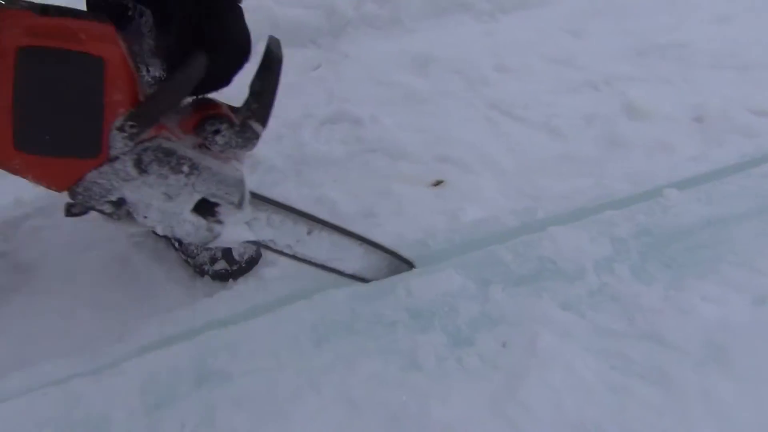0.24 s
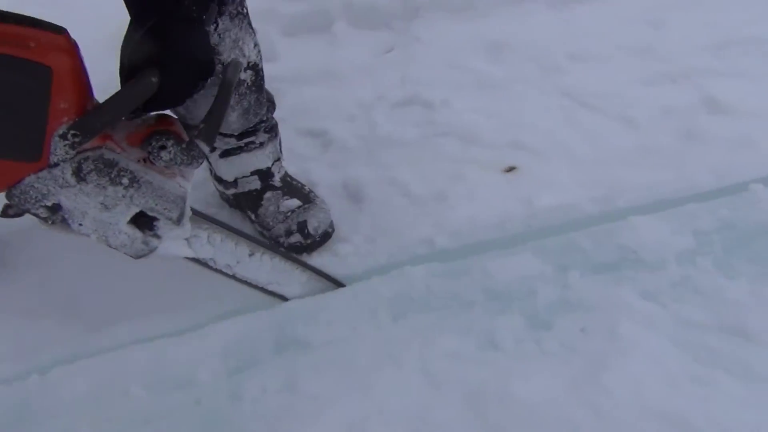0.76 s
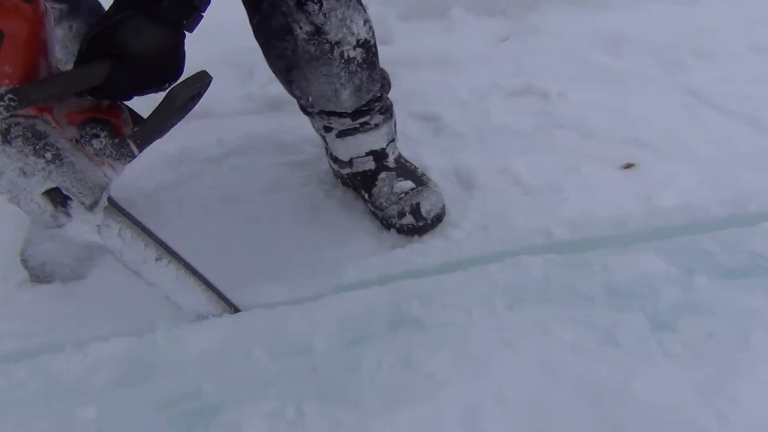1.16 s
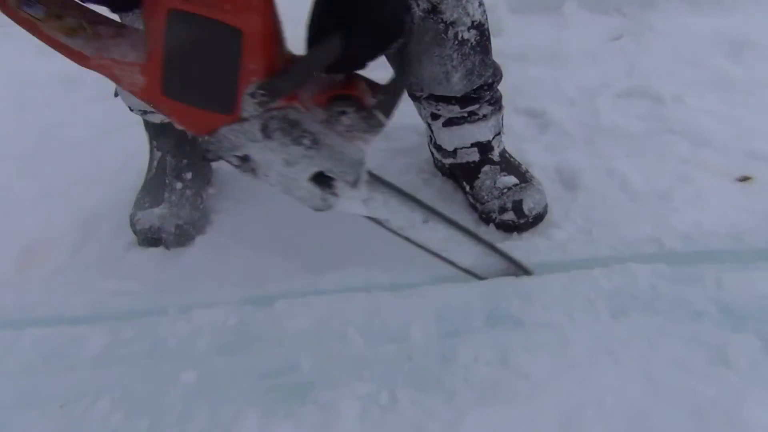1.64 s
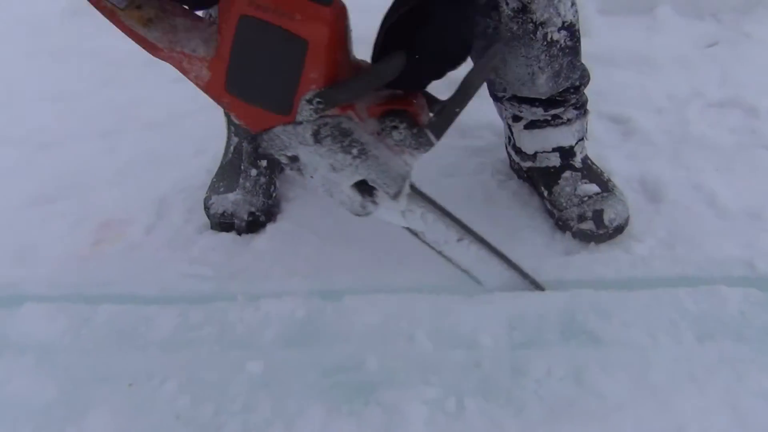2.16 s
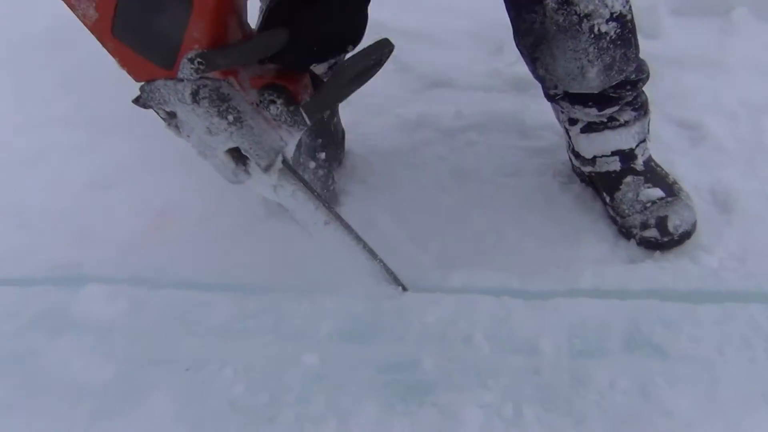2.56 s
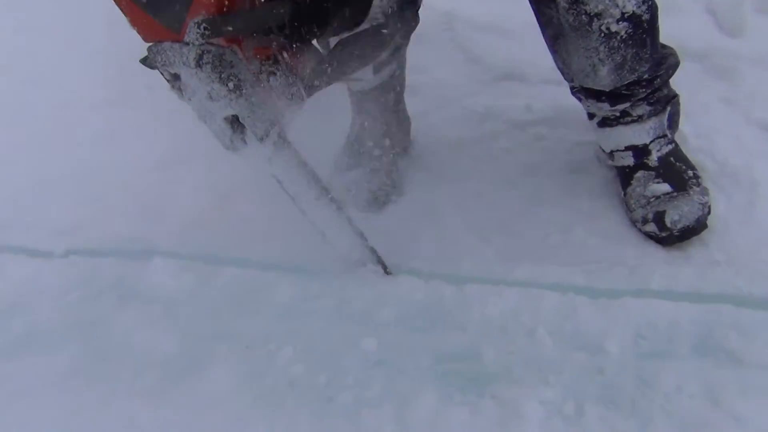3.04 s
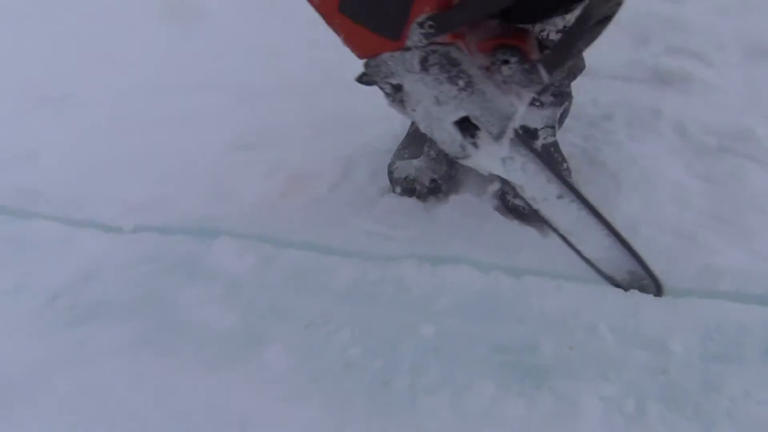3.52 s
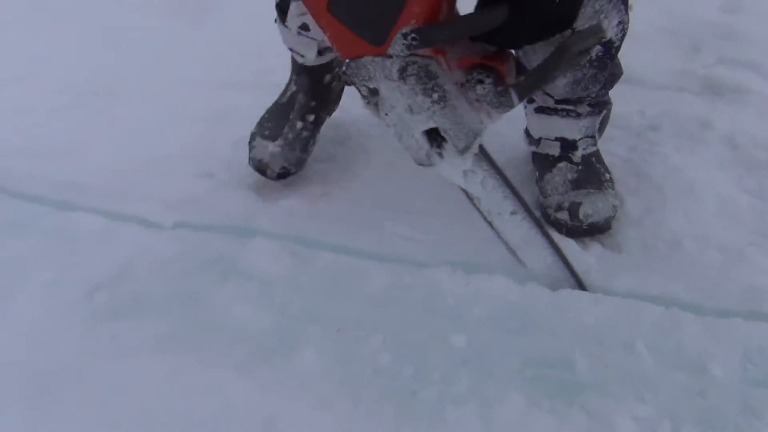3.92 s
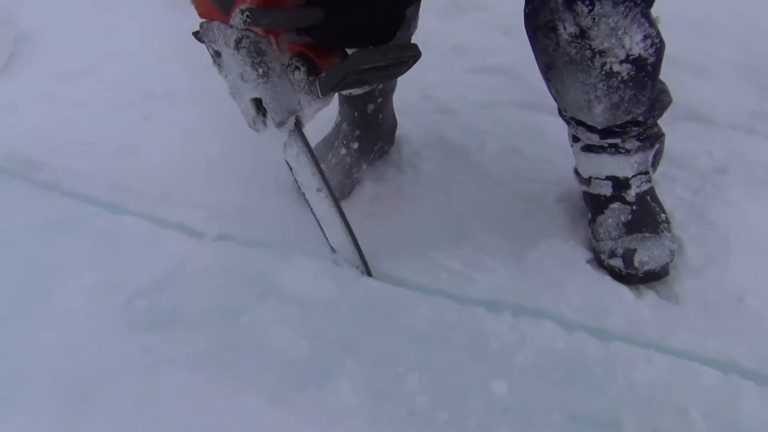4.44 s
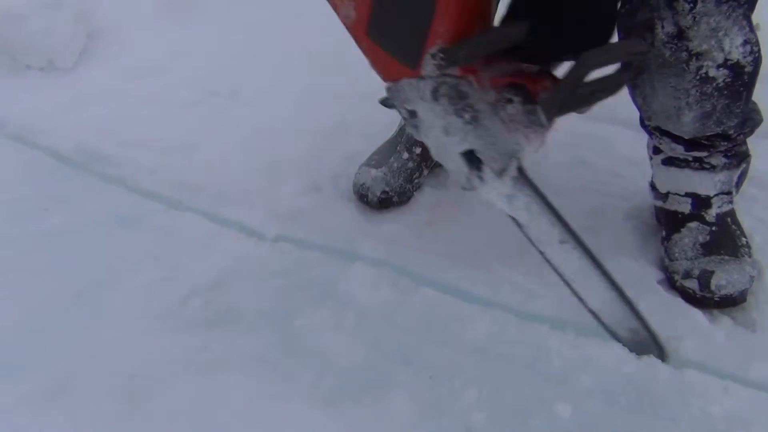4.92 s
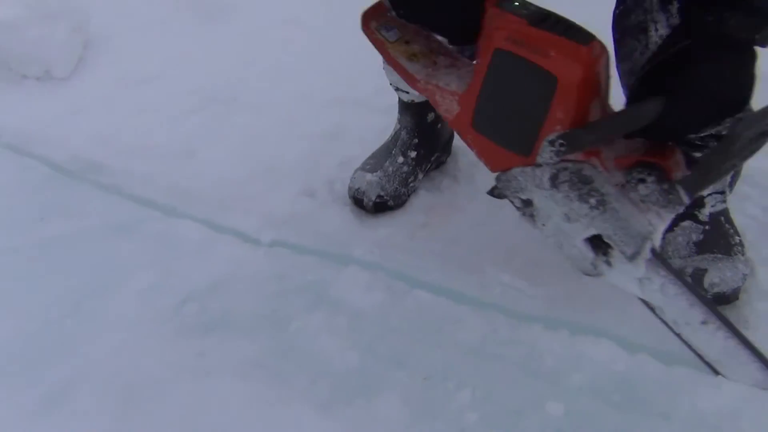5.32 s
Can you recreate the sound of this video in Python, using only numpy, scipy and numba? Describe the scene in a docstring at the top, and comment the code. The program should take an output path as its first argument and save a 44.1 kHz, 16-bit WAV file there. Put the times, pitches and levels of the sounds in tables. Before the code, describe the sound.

Close by on a frozen lake, a two-stroke chainsaw is already cutting ice at high revs and keeps going without a break. The bright hiss of the sliding chain and flying ice chips sits on top of a shivering whine and the engine's buzz. The cut growls each time the bar is pressed in, then eases. The open air adds no reverberation, and a light wind is barely audible underneath.

```python
"""On a frozen lake, close by: a two-stroke chainsaw at full throttle works a slot in thick ice.
Drive links whine on the six-tooth sprocket, cutters chip the ice and growl with each push,
chain and chips hiss along the bar, and the exhaust buzzes underneath. A light wind rumbles.
Snow swallows all reverberation; only the ice sheet returns one short reflection."""
import sys
import numpy as np
from scipy import signal
from scipy.fft import rfft, irfft, next_fast_len
from scipy.io import wavfile
from scipy.ndimage import uniform_filter1d, map_coordinates
from numba import njit

SR = 44100
rng = np.random.default_rng(int(sys.argv[2]) if len(sys.argv) > 2 else 0)


def unload_wav(signal):
    """Save mono or channel-first audio to the path in sys.argv[1] as 16-bit WAV at rate SR, clipped to [-1, 1]."""
    wavfile.write(
        sys.argv[1],
        SR,
        np.round(np.clip(np.atleast_2d(signal).T, -1, 1) * 32767).astype(np.int16),
    )


N = 245637
SPROCKET_TEETH, CHAIN_LINKS = 6, 84


def undb(db):
    """Decibels to gain."""
    return 10 ** (np.asarray(db) / 20)


def curves(table):
    """Each column after the time column, interpolated per sample."""
    time_s, *columns = np.transpose(table)
    return [np.interp(np.arange(N) / SR, time_s, column) for column in columns]


def stretch(db, factor):
    """Scale a level curve's swing about its mean."""
    return db.mean() + factor * (db - db.mean())


def unit(x):
    """Scale to rms 1."""
    return x / np.sqrt(np.mean(x ** 2))


def noise():
    """White noise."""
    return rng.standard_normal(N)


def walk(hz):
    """Random levels held 1 / hz s and smoothed twice; rms 1."""
    hold = max(int(SR / hz), 1)
    steps = np.repeat(rng.standard_normal(N // hold + 1), hold)
    return unit(uniform_filter1d(uniform_filter1d(steps, hold), hold)[:N])


def colour(x, points):
    """Minimum-phase filter through (freq_hz, gain_db) points; output rms 1."""
    size = next_fast_len(N + SR // 4, True) // 2 * 2
    hz, db = np.transpose(points)
    log_hz = np.log(np.arange(size // 2 + 1) * SR / size + 1)
    cepstrum = irfft(np.log(undb(np.interp(log_hz, np.log(hz), db))))
    cepstrum[1:size // 2] *= 2
    cepstrum[size // 2 + 1:] = 0
    return unit(irfft(rfft(x, size) * np.exp(rfft(cepstrum)))[:N])


@njit
def resonance(x, centre_hz, width_hz):
    """State-variable band-pass with a moving centre."""
    out, band_state, low_state = np.empty(len(x)), 0., 0.
    for i in range(len(x)):
        g, damping = np.tan(np.pi * centre_hz[i] / SR), width_hz / centre_hz[i]
        band = (band_state + g * (x[i] - low_state)) / (1 + g * (g + damping))
        band_state, low_state = 2 * band - band_state, low_state + 2 * g * band
        out[i] = damping * band
    return out


def clicks(phase, pattern, scatter_db, jitter_cycles):
    """One click per cycle, sized by a repeating pattern; size and timing scatter."""
    cycle = np.arange(1, int(phase[-1]))
    chance = rng.standard_normal((len(cycle), 2))
    at = np.interp(cycle + jitter_cycles * chance[:, 0], phase, np.arange(N))
    size = pattern[cycle % len(pattern)] * undb(scatter_db * chance[:, 1])
    i = at.astype(int)
    return (np.bincount(i, size * (1 - at + i), N + 1) + np.bincount(i + 1, size * (at - i), N + 1))[:N]


# Wind spectrum: freq_hz, gain_db
WIND_SPECTRUM = [(15, -5), (30, 0.5), (60, -2.5), (120, -7.5), (250, -14.5), (500, -12), (2000, -47)]

def wind():
    """Light wind: a low, uneven rumble, partly different left and right."""
    common = colour(noise(), WIND_SPECTRUM)
    sides = np.array([common + 0.48 * colour(noise(), WIND_SPECTRUM) for _ in range(2)])
    return sides * undb(-63 + 0.73 * walk(12) + 2.8 * walk(35) + np.array([[1.1], [-1.1]]))


# Muffler response: freq_hz, gain_db
MUFFLER = [(60, -8), (154, -11), (310, -7), (460, -13), (620, -0.5), (800, 2), (1100, 5), (1500, -4.5),
           (2200, -2.5), (3300, 0.5), (6000, -13)]

def exhaust(turns):
    """One firing per turn, alternately strong and weak, through the muffler."""
    firings = clicks(turns, undb([0, -4.5]), scatter_db=2.0, jitter_cycles=0.012)
    return colour(firings, MUFFLER) * undb(-51.5 + 3.2 * walk(4.3))


# Pushes of the bar into the ice: start_s, length_s, pressure_frac, lean_frac
BAR_PUSHES = [(0.303, 1.1, 0.73, .7), (1.997, 0.47, 0.94, 0.9), (2.36, .34, .55, 1),
              (2.706, 0.39, 0.36, 0.5), (3.841, 0.33, 0.84, 0.57), (4.16, 0.48, 1, .75),
              (5.21, .43, 0.92, 0.74)]

def pushes(attack_s=0.15, release_s=0.12):
    """Pressure on the ice and lean on the slot wall, 0-1: each push builds, holds and lets go."""
    t, out = np.arange(N) / SR, 0
    for start_s, length_s, pressure, lean in BAR_PUSHES:
        rise, fall = (t - start_s) / attack_s, 1 - (t - start_s - length_s) / release_s
        envelope = np.clip(np.minimum(rise, fall), 0, 1)
        out = np.maximum(out, np.outer([pressure, lean], envelope))
    return out


def lean_hum(turns, lean):
    """Left and right cutters alternate, so a leaning bar hums at about one cycle per four links."""
    phase = turns * SPROCKET_TEETH / 4 * .988 + .08 * walk(30)
    return np.sqrt(2) * np.sin(2 * np.pi * phase) * undb(-86 + 21.5 * lean + 2.0 * walk(20))


# Growl partials: cutter_rate_multiple, offset_db, pressure_swing_frac, blur_cycles
GROWL_TONES = [(.97, -5.5, 0.88, 0.27), (1.022, -2, 0.9, 0.1), (1.53, -18, 0.46, 0.32),
               (2.49, -2.5, 0.4, 0.28), (3, 4, 0.58, 0.4), (5, 11, 0.27, 0.48), (7, -10, 0.4, 0.36)]

def growl(turns, pressure):
    """Cutters hammer at half the link rate; their uneven spacing splits the tone."""
    cutter_phase = turns * SPROCKET_TEETH / 2
    level_db, out = -73 + 25 * pressure, 0
    for multiple, offset_db, swing, blur_cycles in GROWL_TONES:
        tone = np.sqrt(2) * np.sin(2 * np.pi * (multiple * cutter_phase + blur_cycles * walk(45)))
        out = out + tone * undb(stretch(level_db, swing) + offset_db + 2 * walk(50))
    return out


# Bending modes of the steel bar: freq_hz, width_hz, relative_db
BENDING_MODES = [(2600, 70, -56.5), (3114, 71, -52.5), (3380, 160, -49), (3680, 97, -51.5), (4154, 93, -54),
                 (4980, 64, -59), (5560, 140, -62), (6500, 150, -55), (7020, 140, -48)]

def bar_modes():
    """The scraping chain rings the bar's modes; each comes and goes as the ice grips another spot."""
    scrape, out = noise(), 0
    for freq_hz, width_hz, db in BENDING_MODES:
        centre_hz = freq_hz * (1 + 0.0076 * walk(4.07))
        mode = unit(resonance(scrape, centre_hz, float(width_hz)))
        out = out + mode * undb(db - 3.0 + 3.0 * walk(6))
    return out


# Chain sliding in the bar: time_s, base_db, centre_hz
SLIDE_RING = [(0.0, -34.5, 9000), (0.14, -32, 8600), (0.37, -37.5, 8800), (0.99, -35.5, 8600),
              (1.29, -33.5, 8850), (1.52, -30.5, 8435), (1.91, -43.5, 8670), (2.59, -34, 8750),
              (3.57, -32.5, 8470), (3.86, -35.5, 8806), (5.0, -30.5, 8363), (5.2, -34, 8600),
              (5.26, -37.5, 8926), (5.52, -34.5, 8670), (5.57, -36, 8630)]

def bar_ring():
    """The sliding chain rings the bar high up; slot depth shifts the pitch, packed slush damps it."""
    base_db, centre_hz = curves(SLIDE_RING)
    ring = noise()
    for _ in range(2):
        ring = resonance(ring, centre_hz, width_hz=2000.0)
    return unit(ring) * undb(stretch(base_db, 1.04) + 0.85 + .5 * walk(30))


# Coarse slush and the chip jet along the bar: time_s, slush_base_db, jet_base_db
CHIP_LEVELS = [(0.0, -39.5, -47), (0.08, -44.5, -43.5), (0.46, -36.5, -38), (0.93, -35.5, -37.5),
               (1.24, -42.5, -40), (1.47, -40, -46), (1.75, -36.5, -35.5), (1.84, -43.5, -37),
               (2.14, -37, -35.5), (2.7, -40.5, -39), (3.07, -37.5, -41.5), (3.24, -44, -39),
               (3.35, -35.5, -41), (3.72, -42, -41), (4.03, -39, -37), (5.12, -45, -48), (5.14, -48, -45),
               (5.57, -45, -38.5)]
# Fine powder blown from the slot: time_s, base_db
POWDER_LEVEL = [(0.0, -59), (0.34, -46), (0.74, -45.5), (1.86, -53), (2.51, -47), (3.99, -53), (4.17, -47),
                (4.98, -49.5), (5.1, -55), (5.49, -51), (5.57, -52)]
# Spectra of the three showers: freq_hz, gain_db
SLUSH_SPECTRUM = [(3500, -32), (4600, -17), (5100, -16.5), (5700, -8), (6400, 2), (7100, 2), (8000, 0.5),
                  (9500, -14.5), (12000, -36)]
JET_SPECTRUM = [(7000, -20.5), (8800, -2.5), (9800, 2.5), (11100, 2), (11800, -3.5), (12800, -8),
                (14000, -29)]
POWDER_SPECTRUM = [(3000, -12.5), (6000, -1.5), (11000, 5.5), (13000, 1.5), (14000, 2), (15800, -2)]

def chips(turns, grains_per_s=22000, spread_db=1.5):
    """Showers of ice grains in three sizes, pulsing slightly per cutter pair and twice per turn."""
    pulse = 1 + 0.2 * np.cos(np.pi * turns * SPROCKET_TEETH / 2) + 0.14 * np.cos(4 * np.pi * turns)
    slush_db, jet_db = curves(CHIP_LEVELS)
    showers = [(SLUSH_SPECTRUM, slush_db + 0.22),
               (JET_SPECTRUM, stretch(jet_db, 1.12) + .5),
               (POWDER_SPECTRUM, curves(POWDER_LEVEL)[0] + 7.7)]
    out = 0
    for spectrum, level_db in showers:
        grains = noise() * (rng.random(N) < grains_per_s / SR) * undb(spread_db * noise())
        out = out + colour(pulse * grains, spectrum) * undb(level_db + 1.1 * walk(55))
    return out


# Crumbling ice and slack chain: time_s, base_db
RASP_LEVEL = [(0.0, -44.5), (0.57, -41.5), (0.6, -43), (1.02, -44), (1.23, -41.5), (1.6, -44.5),
              (2.68, -40.5), (2.73, -41.5), (3.07, -41), (3.46, -46), (4.48, -37.5), (4.98, -43.5),
              (5.12, -45), (5.55, -40), (5.57, -47)]
RATTLE_LEVEL = [(0.0, -40), (0.06, -40), (1.35, -42.5), (1.58, -44.5), (1.99, -37.5), (2.26, -41.5),
                (2.34, -41), (3.47, -45.5), (3.63, -37.5), (3.74, -42.5), (4.1, -40.5), (4.65, -44.5),
                (5.57, -41)]
# Spectra of cutter strike, crumbling ice and slack chain: freq_hz, gain_db
KNOCK_SPECTRUM = [(200, -33.5), (360, -17), (440, -14.5), (520, 1), (640, 0.5), (820, 1.5), (1020, -1),
                  (1450, -1.5), (2000, -19), (4000, -40.5)]
RASP_SPECTRUM = [(300, -41), (520, -17), (800, -12.5), (1200, -12.5), (1700, 0.5), (1950, 3), (2300, -1.5),
                 (2800, 3), (3500, -11.5), (4400, -8.5), (5200, -5.5), (6000, -12), (8000, -21),
                 (15000, -33)]
RATTLE_SPECTRUM = [(1000, -24.5), (2500, -16), (3200, 5.5), (3800, 2.5), (4200, 1.5), (4600, -13),
                   (5200, -2.5), (6500, -3), (9000, -21)]

def cutters(turns, pressure):
    """Every second link carries a cutter; some bite deeper, in a pattern repeating each chain lap."""
    grip_db = 1.04 * walk(35)  # the ice gives way unevenly
    cutter_phase = turns * SPROCKET_TEETH / 2
    depth = rng.standard_normal(CHAIN_LINKS // 2)
    strikes = clicks(cutter_phase + .25 * walk(40), undb(3.8 * depth), scatter_db=1.5, jitter_cycles=.24)
    knock = colour(strikes, KNOCK_SPECTRUM) * undb(-52 + 6 * pressure + 1.5 * walk(25))
    burst = 1 + 0.39 * np.cos(2 * np.pi * cutter_phase)  # ice crumbles behind each cutter
    bite = undb(depth[cutter_phase.astype(int) % len(depth)]) * burst
    rasp_db = curves(RASP_LEVEL)[0] + 3
    rasp = colour(bite * noise(), RASP_SPECTRUM) * undb(rasp_db + 0.75 * walk(35))
    rattle_db = stretch(curves(RATTLE_LEVEL)[0], 1.22) - 0.35
    rattle = colour(bite * noise(), RATTLE_SPECTRUM) * undb(rattle_db + 0.99 * walk(35))
    return (knock + rasp + rattle) * undb(grip_db)


# Sprocket whine, partials 1 to 3: time_s, base_db
WHINE_FIRST = [(0.0, -46), (0.31, -55), (0.4, -49), (0.73, -42.5), (1.12, -55.5), (1.29, -46.5),
               (1.68, -57.5), (2.65, -44), (2.76, -60), (3.35, -48.5), (3.86, -54.5), (4.11, -42.5),
               (4.14, -49.5), (4.5, -43.5), (5.04, -49), (5.15, -62), (5.38, -42), (5.57, -40)]
WHINE_SECOND = [(0.0, -37), (0.37, -41), (0.42, -54), (0.78, -44.5), (0.84, -52), (0.87, -44.5),
                (1.29, -39.5), (1.33, -52), (1.38, -40.5), (1.44, -43.5), (1.64, -37.5), (1.95, -44),
                (2.0, -40.5), (2.08, -56), (2.15, -39.5), (2.2, -43), (2.42, -38.5), (2.59, -46.5),
                (3.15, -42), (3.21, -39), (3.83, -43), (3.88, -38), (4.17, -44.5), (4.3, -37), (4.62, -42),
                (4.7, -38), (5.26, -43), (5.57, -41)]
WHINE_THIRD = [(0.0, -48), (0.2, -38), (0.33, -46), (0.4, -39.5), (0.79, -46.5), (0.9, -59), (1.19, -44),
               (1.83, -53), (1.99, -43.5), (2.09, -59), (2.44, -45), (3.18, -46), (3.27, -52.5),
               (4.67, -44.5), (4.87, -47), (5.57, -47)]
# Upper partials, following the third's curve: link_rate_multiple, offset_db
WHINE_UPPER = [(4, -8), (5, -21), (6, -26)]

def whine(turns, pressure, shiver_db=1.2):
    """Links seat on the sprocket; chain slack makes the tone shiver, and each firing tugs at it."""
    link_phase = SPROCKET_TEETH * turns + .012 * walk(90) + .02 * walk(15)
    link_phase += .009 * np.sin(2 * np.pi * turns)
    # Under pressure the chain snatches and the tone stutters.
    link_phase += 0.024 * pressure * walk(30)
    stutter_db = .5 + 1.5 * pressure
    upper_db = stretch(curves(WHINE_THIRD)[0], 1.26)
    partials = [(1, stretch(curves(WHINE_FIRST)[0], 1.15) + .2),
                (2, stretch(curves(WHINE_SECOND)[0], 1.2) + 0.18),
                (3, upper_db - 1.4)]
    partials += [(multiple, upper_db + offset_db) for multiple, offset_db in WHINE_UPPER]
    out = 0
    for multiple, level_db in partials:
        gain = undb(level_db + shiver_db * walk(60) + stutter_db * walk(25.03))
        out = out + gain * np.sin(2 * np.pi * multiple * link_phase)
    return np.sqrt(2) * out


def ice_reflection(x, strength=.25):
    """The ice sheet mirrors the sound; the short delay sweeps as the saw is lifted and lowered."""
    delay_s = .0024 + 0.000253 * walk(2.5)
    mirrored = map_coordinates(x, [np.arange(N) - delay_s * SR], order=3)
    return (x + strength * mirrored) / np.hypot(1, strength)


# Sideways swing of the saw: time_s, left_minus_right_db
SAW_SWING = [(0.0, 3), (0.42, -0.5), (1.02, 1), (1.41, 3), (1.81, -0.5), (3.19, 0), (3.72, -0.5),
             (3.89, -1.5), (4.75, 0), (5.29, -2.5), (5.57, -1.5)]
# Balance per band: centre_hz, steady_left_minus_right_db, swing_frac
BAND_BALANCE = [(200, 0.5, 0.09), (600, 1.9, 0.65), (1030, 0.6, 0.56), (1430, 0, 0.24), (1890, 1.1, 0.64),
                (2440, 0, 0.04), (3500, 0.1, 0.08), (4750, 1.6, 1.0), (6360, 0, 0.64), (8700, 0, 0.75),
                (11500, -0.4, 0.75), (13900, 0, 0.3)]

def pan(x):
    """The saw swings left and right with the strokes; the balance moves more in some bands."""
    swing_db, = curves(SAW_SWING)
    spectrum, log_hz = rfft(x), np.log(np.arange(N // 2 + 1) * SR / N + 1)
    log_centres, out = np.log(np.array(BAND_BALANCE)[:, 0]), 0
    for weights, (_, steady_db, share) in zip(np.eye(len(BAND_BALANCE)), BAND_BALANCE):
        band = irfft(spectrum * np.interp(log_hz, log_centres, weights), N)
        out = out + band * undb(np.array([[.5], [-.5]]) * (steady_db + share * swing_db))
    return out


# Crankshaft speed under changing load: time_s, speed_hz
ENGINE_SPEED = [(0.0, 157), (0.37, 156), (0.45, 152.9), (0.48, 155.4), (0.65, 153.5), (0.84, 157.1),
                (1.26, 156.4), (1.33, 154.1), (1.41, 159.5), (1.86, 152.5), (2.02, 154.1), (2.09, 151.6),
                (2.37, 155.9), (2.5, 154), (3.09, 155.7), (3.18, 159.0), (3.3, 152.8), (3.77, 151.9),
                (3.86, 153.4), (4.1, 151.6), (4.14, 154.5), (4.19, 151.4), (4.24, 154.5), (4.59, 153.3),
                (4.65, 155.8), (5.55, 153.2), (5.57, 152)]

def scene():
    """One crankshaft times the exhaust and chain; the saw is panned over the wind."""
    turns = np.cumsum(curves(ENGINE_SPEED)[0]) / SR
    pressure, lean = pushes()
    cutting = ice_reflection(cutters(turns, pressure) + bar_ring() + bar_modes() + chips(turns))
    tones = exhaust(turns) + whine(turns, pressure) + growl(turns, pressure) + lean_hum(turns, lean)
    return pan(tones + cutting) + wind()


def record(dry):
    """Steep low-pass at 15.8 kHz."""
    return signal.sosfilt(signal.ellip(10, .2, 80, 15800, fs=SR, output="sos"), dry)


dry = scene()
out = record(dry)
unload_wav(out)
```